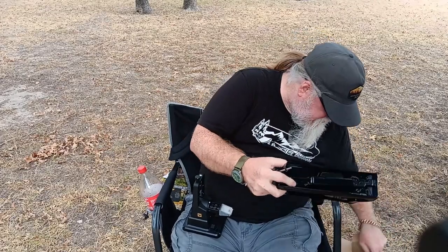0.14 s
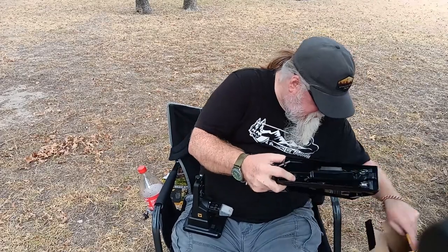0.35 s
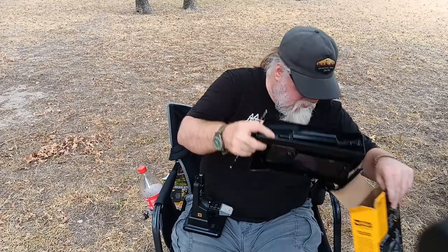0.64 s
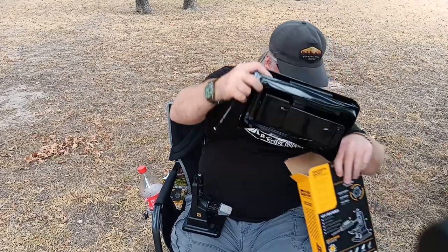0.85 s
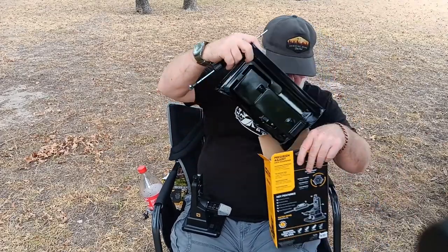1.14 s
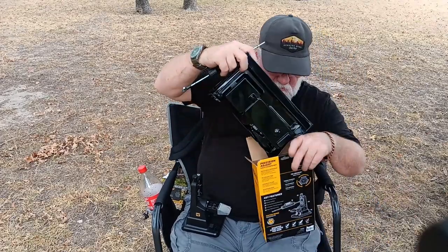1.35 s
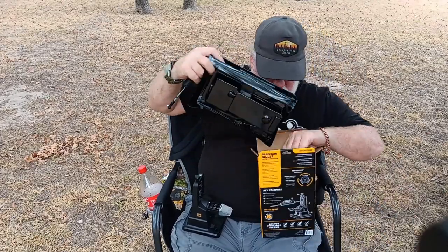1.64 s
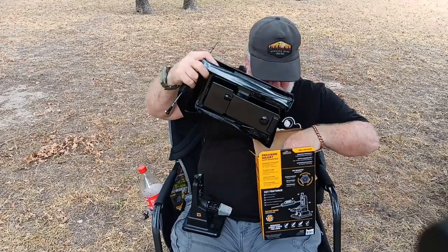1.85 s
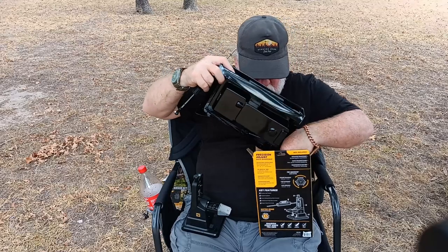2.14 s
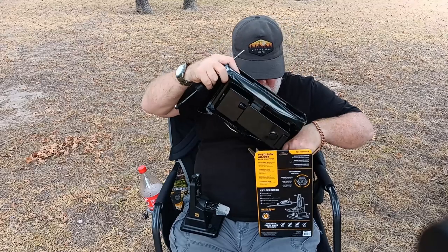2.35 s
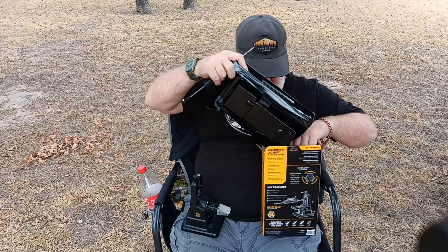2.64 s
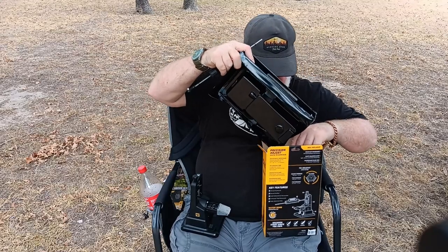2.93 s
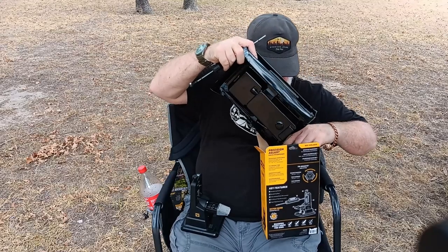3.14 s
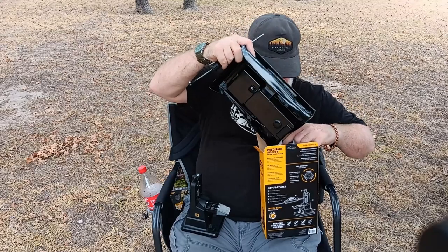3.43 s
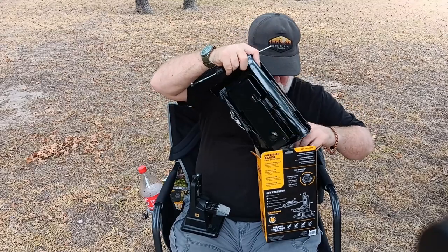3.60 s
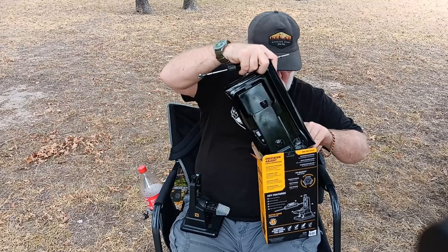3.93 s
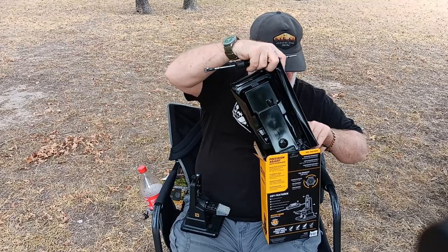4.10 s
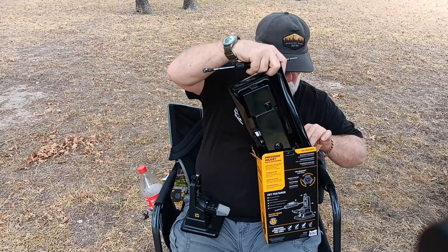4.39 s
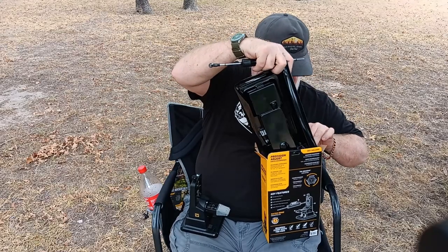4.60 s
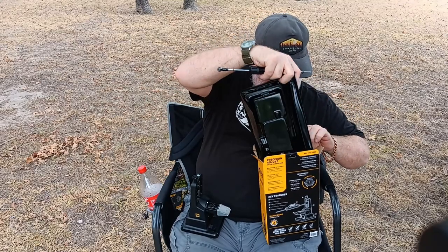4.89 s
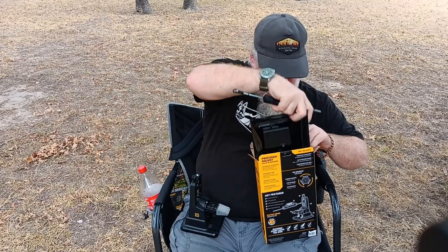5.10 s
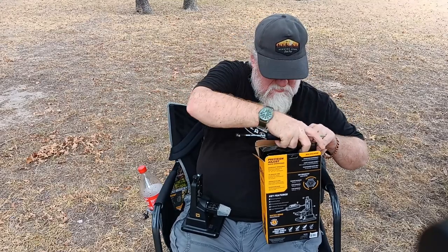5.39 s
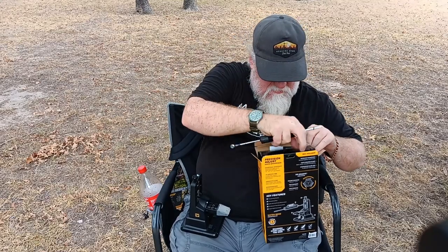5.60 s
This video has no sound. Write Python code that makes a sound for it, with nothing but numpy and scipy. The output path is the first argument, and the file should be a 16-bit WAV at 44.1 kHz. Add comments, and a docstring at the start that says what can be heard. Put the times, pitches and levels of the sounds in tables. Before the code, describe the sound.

Outdoors, a thin plastic tray clacks and clatters against a cardboard box, then scrapes down inside amid dull knocks as low wind rumble fades.

```python
"""Outdoors, wind rumbles and buffets the microphone from the start, then dies down, over a faint hiss of still air.
Light taps on gripped plastic, cardboard knocks and hand rubs come first; then a thin plastic tray clacks and clatters.
Near the end its rim sings faintly on the box edge, and the tray scrapes down into the box among the last knocks.
Blows ring each object's own tones over a noisy crack; rubs send tiny slips through the box's tones.
The wind is low filtered noise."""
import sys
import numpy as np
from scipy import signal
from scipy.fft import rfft, irfft
from scipy.io import wavfile

SR = 44100
rng = np.random.default_rng(int(sys.argv[2]) if len(sys.argv) > 2 else 0)


def inscribe(sig):
    """Save sig as 16-bit PCM at rate SR to the path in sys.argv[1].

    A 1-D sig is mono; a 2-D sig holds one channel per row.
    Samples are clipped to [-1, 1] before scaling.
    """
    pcm = np.round(np.clip(np.atleast_2d(sig).T, -1, 1) * 32767)
    wavfile.write(sys.argv[1], SR, pcm.astype(np.int16))


N = 253559
TIME = np.arange(N) / SR

# pitch ranges from thud to tick: low_hz [Hz], high_hz [Hz]
TONE_BANDS = [(170, 420), (420, 1100), (1100, 2900), (2900, 6500), (6500, 15000)]
# tones of the box's air space and panels: pitch_hz [Hz], width_hz [Hz], relative level_db [dB]
BOX_TONES = [(314, 20, 1.5), (397, 52.5, 3.5), (492, 48, 6), (563, 90, 4), (623, 59, -16), (816, 54, 6),
             (955, 110, 4), (1032, 42, -21), (1224, 97, -2), (1382, 60, -3.5), (1592, 39, -7.5),
             (1840, 210, -1), (2150, 86, -6), (2393, 650, -1.5), (3330, 46, -16.5), (2917, 640, -6),
             (3920, 92, -47.5)]
ATTACK_S = .025  # the part of a blow whose loudness is set
PLASTIC_BASS_DB_PER_OCT = 9  # fall below the ring


def undb(db):
    """Turn decibels into a gain."""
    return 10 ** (np.asarray(db) / 20)


def unit(x):
    """Scale to an average (rms) strength of 1."""
    return x / np.sqrt(np.mean(x ** 2))


def band(x, lo_hz, hi_hz, order=3):
    """Keep only the pitches between two limits."""
    limits_hz = [lo_hz, min(hi_hz, .45 * SR)]
    return signal.sosfilt(signal.butter(order, limits_hz, "band", fs=SR, output="sos"), x)


def colour(x, points, size=2048):
    """Filter through (Hz, dB) points, reacting as early as possible (minimum phase)."""
    hz, db = np.transpose(points)
    grid = np.maximum(np.arange(size // 2 + 1) * SR / size, 1)
    cepstrum = irfft(np.log(undb(np.interp(np.log(grid), np.log(hz), db))))
    # folding the cepstrum forward puts the response after time zero
    cepstrum[1:size // 2] *= 2
    cepstrum[size // 2 + 1:] = 0
    response = irfft(np.exp(rfft(cepstrum)))
    return signal.fftconvolve(x, response)[:len(x)]


def walk(rate):
    """Wander at random with a spread near 1, taking rate steps per second."""
    steps = rng.standard_normal(int(N / SR * rate) + 4)
    return np.interp(TIME * rate, np.arange(len(steps)), steps) * np.sqrt(3 / 2)


def wind():
    """Eddies at the microphone: a deep rumble and lighter buffeting above it, swelling with each gust."""
    # the breeze dies down: time_s [s], strength_db [dB, before the rumble and buffet levels]
    breeze = [(0, -31.5), (.35, -39.5), (.65, -56), (1.2, -50.5), (2.3, -57), (3.3, -59.5), (3.8, -78),
              (4.5, -81), (5.75, -74)]
    # gusts on top of it: peak_s [s], half_length_s [s], strength_db [dB, before those levels]
    gusts = [(0.045, 0.054, -31), (0.324, 0.055, -41.5), (0.81, .03, -48), (1.02, 0.091, -47),
             (1.241, 0.061, -40.5), (1.568, 0.075, -43.5), (1.816, 0.11, -44.5), (2.534, 0.049, -44),
             (2.663, .1, -63), (2.832, 0.055, -46), (3.079, 0.097, -46), (3.248, 0.096, -45.5),
             (3.622, 0.083, -49.5), (4.034, 0.04, -50.5), (4.633, 0.045, -55.5), (5.22, 0.12, -57)]
    rumble_db, buffet_db = -2, -12  # relative to the strength
    strength = undb(np.interp(TIME, *np.transpose(breeze)))
    for peak_s, half_length_s, strength_db in gusts:
        gust = undb(strength_db) * np.exp(-((TIME - peak_s) / half_length_s) ** 2)
        strength = np.hypot(strength, gust)
    rumble = unit(band(rng.standard_normal(N), 22, 58))
    buffet_points = [(45, -20), (80, -4), (115, 0), (150, -15), (240, -28), (500, -48), (2000, -80)]
    buffet = unit(colour(rng.standard_normal(N), buffet_points, size=8192))
    return strength * (undb(rumble_db) * rumble + undb(buffet_db) * buffet)


def still_air():
    """Steady faint noise of still outdoor air."""
    # its tone: pitch_hz [Hz], relative level_db [dB per Hz]
    air_tone = [(60, -10.5), (110, -12), (220, -27.5), (400, -14), (800, -24.5), (1500, -20), (4300, -32.5),
                (15000, -48.5)]
    return undb(-78.0) * unit(colour(rng.standard_normal(N), air_tone))


def fade(t, t60):
    """Die away steadily, 60 dB down after t60 seconds."""
    return np.exp(-np.log(1000) * t / t60)


def ring(t, hz, t60):
    """Sound one tone of a struck object."""
    return np.sin(2 * np.pi * hz * t) * fade(t, t60)


def contact(t, clatter_s, rate, chatter):
    """A first touch, then a spatter of more; the longer the edges skid, the more of the energy it holds."""
    touches = (rng.random(len(t)) < rate / SR) * rng.standard_normal(len(t))
    spatter = touches * np.sqrt(t / clatter_s) * np.exp(-t / clatter_s)
    push = spatter / np.sqrt(np.sum(spatter ** 2) + 1e-12) * chatter * clatter_s
    push[0] += 1
    return push


def crackle(push, grain, t60, damping, tilt_db):
    """Countless close tones heard as noise: every touch tops up their energy, and the treble dies first."""
    out = 0
    for k, (low_hz, high_hz) in enumerate(TONE_BANDS):
        band_t60 = t60 * (TONE_BANDS[2][0] / low_hz) ** damping
        keep = fade(1 / SR, band_t60) ** 2  # share of energy left after one sample
        energy = signal.lfilter([1], [1, -keep], push ** 2 + 1e-18)
        out = out + undb(k * tilt_db) * unit(grain[k] * np.sqrt(energy))
    return unit(out)


def attack_levels(db, dullness, ring_hz, colour_db, bass_db):
    """Fall from the ring to the bass and, the softer the contact, to the treble; the material colours it."""
    octaves = np.log2(np.sqrt(np.prod(TONE_BANDS, axis=1)) / ring_hz)
    treble_fall_db = dullness * np.maximum(octaves, 0)
    return db + np.array(colour_db) - treble_fall_db + bass_db * np.minimum(octaves, 0)


def weigh(x, band_db, size=2048):
    """Give a blow's attack its level in each band."""
    centres = [np.sqrt(lo * hi) for lo, hi in TONE_BANDS]
    hz = np.arange(size // 2 + 1) * SR / size
    for _ in range(2):  # the second pass corrects the first
        power = 2 * np.abs(rfft(x[:int(ATTACK_S * SR)], size)) ** 2 / (size * ATTACK_S * SR)
        have_db = [10 * np.log10(power[(hz >= lo) & (hz < hi)].sum()) for lo, hi in TONE_BANDS]
        x = colour(x, list(zip(centres, np.subtract(band_db, have_db))), size=1024)
    return x


def blows(table, modes, colour_db, bass_db, crack, crack_t60, damping, own_ring, own_t60, rate, chatter, rise_s):
    """Each blow rings the object's tones in a new mix, over a noisy crack."""
    out = np.zeros(N + SR)
    t = np.arange(SR // 5) / SR
    rings = np.array([undb(db) * ring(t, hz, t60) for hz, db, t60 in modes])
    grain = np.array([band(rng.standard_normal(N + SR), lo, hi) for lo, hi in TONE_BANDS])
    # small panels radiate little bass
    radiation = signal.butter(3, [185, 13500], "band", fs=SR, output="sos")
    for start_s, level_db, dullness, clatter_s, ring_hz in table:
        start = int(start_s * SR)
        span = slice(start, start + len(t))
        push = contact(t, clatter_s, rate, chatter)
        mix = rng.standard_normal(len(modes)) @ rings
        shell = unit(signal.fftconvolve(push, mix)[:len(t)])
        noise = crackle(push, grain[:, span], crack_t60, damping, tilt_db=-2)
        hit = unit(shell + crack * noise)
        # the panel that takes the blow rings loudest, and for longer under a dragging contact
        hit = hit + own_ring * unit(ring(t, ring_hz, own_t60 + 2 * clatter_s))
        # bending waves take a moment to spread
        hit = signal.sosfilt(radiation, hit * (1 - np.exp(-t / rise_s)))
        out[span] += weigh(hit, attack_levels(level_db, dullness, ring_hz, colour_db, bass_db))
    return out[:N]


def taps():
    """Fingers grip the plastic and deaden it, so light taps make short clean clicks."""
    # light taps: start_s [s], level_db [dB at the ring, before colour],
    # dullness [dB per octave above the ring], clatter_s [s], ring_hz [Hz]
    tap_hits = [(.148, -54.5, 8, .002, 2710), (.224, -65, 2, 0.0066, 910), (.242, -41.5, 8, 0.0032, 818),
                (3.142, -71, 10, .003, 2950), (4.558, -56.5, 9, 0.0096, 1360)]
    # tones of gripped plastic: pitch_hz [Hz], relative level_db [dB], t60_s [s]
    tap_tones = [(785, 0, 0.056), (1110, -1, 0.046), (1245, -7, 0.043), (1533, -3.5, 0.033),
                 (1726, -17.5, 0.032), (2160, -14.5, 0.04), (2486, -6.5, 0.044), (2810, -5, .04),
                 (3240, 2.5, 0.031), (4500, -19, 0.035), (4900, -11.5, 0.066)]
    # colour of the material: level_db [dB], one for each tone band
    tap_colour = [1, -3, 3.5, -0.5, -24.5]
    return blows(tap_hits, tap_tones, tap_colour, PLASTIC_BASS_DB_PER_OCT, crack=0.48, crack_t60=0.022,
                 damping=.5, own_ring=0.55, own_t60=0.014, rate=1200, chatter=330, rise_s=0.00058)


def box():
    """Cardboard: dull, quickly damped knocks; the wider a tone, the sooner it dies."""
    # knocks: start_s [s], level_db [dB at the ring, before colour],
    # dullness [dB per octave above the ring], clatter_s [s], ring_hz [Hz]
    box_hits = [(.158, -54.5, 6.5, 0.0069, 300), (.207, -48.5, 10.5, 0.023, 436),
                (.349, -60, 7, 0.0022, 324), (.441, -59, 9.5, 0.0026, 774), (.453, -47, 12, 0.003, 335),
                (.475, -50, 7.5, 0.0048, 348), (.598, -41, 6.5, 0.014, 498), (.64, -45.5, 17, 0.013, 500),
                (.674, -62.5, 5, .002, 497), (.978, -45.5, 8, 0.017, 560), (1.289, -40, 12.5, 0.017, 639),
                (1.31, -44, 14.5, 0.0034, 670), (1.336, -48.5, 6, .004, 460),
                (1.385, -43.5, 14, 0.016, 698), (1.392, -45.5, 8, 0.014, 746),
                (1.414, -49, 19.5, .006, 720), (1.462, -41, 6, .008, 597), (1.5, -45, 12, .018, 326),
                (1.62, -43, 8, .003, 330), (1.703, -62, 11.5, .006, 820), (1.923, -59.5, 10, 0.0068, 507),
                (1.983, -44, 13, 0.0018, 336), (2.077, -46.5, 5.5, 0.0079, 529),
                (2.103, -51, 21.5, 0.0028, 580), (2.136, -51, 34, 0.0047, 650),
                (2.209, -57.5, 12, 0.0047, 817), (2.31, -43.5, 11.5, 0.019, 488),
                (2.343, -45, 9.5, 0.0036, 536), (2.525, -61, 12, 0.0023, 800), (2.75, -59, 3, 0.013, 472),
                (3.238, -67, 17, 0.019, 513), (4.48, -65, 4, 0.011, 486), (4.622, -57.5, 12.5, 0.017, 448),
                (4.668, -60, 10, 0.022, 313), (4.782, -45, 6, .003, 790), (4.853, -37.5, 5.5, 0.013, 379),
                (4.922, -38, 8, 0.011, 378), (4.94, -46, 2.5, 0.0096, 337), (5.098, -49.5, 6.5, .01, 710),
                (5.232, -47.5, 3, .005, 283), (5.519, -53.5, 10, .005, 582), (5.542, -39, 7, 0.0014, 282),
                (5.628, -45.5, 6, 0.0069, 309), (5.656, -44, 5.5, 0.0031, 279),
                (5.69, -39, 10.5, 0.0032, 307)]
    # colour of the material: level_db [dB], one for each tone band
    box_colour = [1.5, 2.5, 2.5, -0.5, -4]
    modes = [(hz, db, np.log(1000) / (np.pi * width)) for hz, width, db in BOX_TONES]
    return blows(box_hits, modes, box_colour, bass_db=10.5, crack=0.38, crack_t60=0.039, damping=0.99,
                 own_ring=1.01, own_t60=0.072, rate=1800, chatter=156, rise_s=0.00093)


def stroke(start, length):
    """A touch that presses in, holds and lifts off."""
    attack_s, release_s = 0.018, 0.026
    t = TIME - start
    return np.clip(np.minimum(t / attack_s, (length - t) / release_s), 0, 1)


def stroke_gains():
    """Body, rasp and hiss of single strokes of hand and tray, which ease off as they go."""
    # strokes on cardboard: start_s [s], length_s [s], rasp_db [dB, before rubbing's trim],
    # body_db [dB relative to the rasp], hiss_db [dB relative to the rasp]
    strokes = [(.3, 0.086, -75.5, 1, 4.5), (.67, 0.074, -72.5, 0, -8), (.86, 0.12, -64, 16, -13),
               (.98, 0.22, -74.5, 19.5, -3.5), (1.28, 0.24, -58.5, 11, -12), (1.423, 0.072, -48, 0, -9),
               (1.48, 0.097, -60.5, 10, -8.5), (1.62, 0.37, -72, 11.5, 1), (1.788, 0.051, -63.5, 2, -5),
               (1.978, 0.11, -59.5, 3.5, -2), (2.07, 0.18, -66.5, 1, -9.5), (2.229, 0.21, -62, 10.5, -6.5),
               (2.39, 0.096, -61, -10, -7), (2.479, 0.068, -68, 11, -1.5), (2.647, 0.099, -56.5, -7.5, -23),
               (2.72, 0.11, -64, 4.5, -14.5), (2.84, .24, -83.5, 8.5, -20), (3.22, 0.11, -80.5, 7, -26),
               (3.449, 0.14, -61.5, 12, -10), (3.623, 0.076, -59, 9, -17), (3.675, .085, -52.5, 0.5, -8.5),
               (3.73, 0.092, -62, -1, -25), (3.828, 0.19, -62, 3.5, -13), (4.06, .06, -65, 9.5, -12),
               (4.201, 0.12, -66, 7.5, -20), (4.431, 0.085, -73.5, 15.5, -25),
               (5.528, 0.23, -58.5, 15, -10), (5.67, 0.093, -71, 20, -9)]
    sag_db_per_s = 15.5
    out = np.zeros((3, N))
    for start_s, length_s, rasp_db, body_db, hiss_db in strokes:
        sag = undb(-sag_db_per_s * np.clip(TIME - start_s, 0, length_s))
        levels = undb([rasp_db + body_db, rasp_db, rasp_db + hiss_db])
        out = np.hypot(out, np.outer(levels, stroke(start_s, length_s) * sag))
    return out


def holding_gains():
    """Body, rasp and hiss of fingers that keep shifting while they hold the box."""
    start_s, end_s = .4, 4.7
    fidget = stroke(start_s, end_s - start_s) * undb(2 * walk(rate=15))
    return np.outer(undb([-74, -84.5, -100]), fidget)  # dB, before rubbing's trim


def slide_gains():
    """Body, rasp and hiss as the tray slides down into the box: pressing harder brightens the sound."""
    # the slide: time_s [s], pressure_db [dB, before the jerks]
    slide_path = [(4.689, -78), (4.76, -54), (4.85, -40.5), (4.93, -40), (5.0, -52), (5.13, -55.5),
                  (5.17, -47.5), (5.21, -52), (5.269, -59.5), (5.34, -100)]
    firm_pressure_db = -41
    # each layer: dB at firm pressure (before rubbing's trim), dB per dB of pressure
    body, rasp, hiss = (-38.5, 0.69), (-40, 1.02), (-53, 0.93)
    time_s, pressure_db = np.transpose(slide_path)
    # the pressure jerks as the rim catches
    jerks_db = 1 * walk(rate=60)
    pressure = np.interp(TIME, time_s, pressure_db) - firm_pressure_db + jerks_db
    slide = np.array([undb(firm_db + growth * pressure) for firm_db, growth in (body, rasp, hiss)])
    return slide * stroke(time_s[0], time_s[-1] - time_s[0])


def slips(rate, spread_db):
    """Dense stick-slip clicks of fine contact points, mostly small and now and then large."""
    size = undb(spread_db * np.minimum(rng.exponential(size=N), 5))
    return unit((rng.random(N) < rate / SR) * rng.choice([-1, 1], N) * size)


def rubbing():
    """Slips drive the box's tones; the finest of them hiss straight from the surface."""
    body, rasp, hiss = np.hypot(np.hypot(stroke_gains(), holding_gains()), slide_gains())
    # the contact catches and lets go many times a second
    grip = undb(2.2 * walk(rate=70))
    drive = grip * (slips(rate=2400, spread_db=3.6) + .5 * rng.standard_normal(N))
    hollow = 0
    for pitch_hz, width_hz, level_db in BOX_TONES:
        # as the point of contact moves, each tone comes and goes
        reach = undb(3.3 * walk(rate=22))
        mode = signal.lfilter(*signal.iirpeak(pitch_hz, pitch_hz / width_hz, fs=SR), drive * reach)
        hollow = hollow + rng.choice([-1, 1]) * undb(level_db) * unit(mode)
    hollow = unit(hollow) + .38 * drive
    low = unit(band(hollow, 240, 1050, order=4))
    middle = unit(band(hollow, 1300, 3500))
    surface_points = [(2500, -40.5), (4000, -1.5), (5500, 5.0), (6800, -6.0), (11500, -9.0), (15500, -20.5)]
    surface = unit(colour(drive, surface_points))
    # the trim of the three layers, in dB
    return undb(-1.5) * body * low + undb(-0.25) * rasp * middle + undb(-2.9) * hiss * surface


def tray():
    """Thin stiff plastic: bright clacks with a short hollow ring."""
    # clacks: start_s [s], level_db [dB at the ring, before colour],
    # dullness [dB per octave above the ring], clatter_s [s], ring_hz [Hz]
    tray_hits = [(.849, -43.5, 3, 0.013, 776), (.858, -36, 4.5, 0.0074, 570), (.888, -38, 9, 0.016, 766),
                 (.927, -37, 6, 0.003, 787), (.938, -44, 14, 0.015, 792), (1.066, -37.5, 6.5, 0.00039, 520),
                 (1.077, -39, 12.5, 0.0024, 765), (1.794, -41, 7, 0.0028, 564),
                 (2.272, -41, 4.5, 0.0019, 500), (2.392, -33.5, 7.5, 0.00053, 745),
                 (2.842, -74, 2.5, 0.0041, 483), (2.905, -78.5, -1, 0.0056, 745),
                 (3.054, -60, 4, 0.0075, 513), (3.424, -35, 0.27, 0.0032, 479),
                 (3.54, -51.5, 12.5, 0.015, 875), (3.911, -36.5, 4, 0.0034, 560),
                 (4.104, -29, 4, 0.0059, 315), (4.117, -30, 4, 0.0069, 672), (4.14, -34, 7.5, 0.004, 786),
                 (4.16, -38.5, 9.5, .009, 1424), (4.177, -43, 12, 0.014, 770), (4.351, -60, 10, 0.039, 970),
                 (4.804, -45, 1, 0.0015, 794), (4.836, -45.5, -3.5, 0.0028, 1880),
                 (5.168, -42, 9, 0.014, 865)]
    # tones of the tray's shell: pitch_hz [Hz], relative level_db [dB], t60_s [s]
    tray_tones = [(197, -8, .13), (307, -7, .17), (468, -6, .16), (630, -6, .13), (684, -3, .13),
                  (797, 0, .12), (885, -4, .11), (1023, -4, .08), (1222, -3, .08), (1340, -4, .075),
                  (1520, -5, .08), (1735, -1, .07), (1915, 0, .06), (2274, 1, .05), (2606, -3, .04),
                  (2950, -5, .04), (3500, -7, .03), (4300, -9, .025), (5090, -11, .02)]
    # colour of the material: level_db [dB], one for each tone band
    tray_colour = [-3, 0.5, 2.5, -5.5, -17.5]
    return blows(tray_hits, tray_tones, tray_colour, PLASTIC_BASS_DB_PER_OCT, crack=1.68, crack_t60=0.039,
                 damping=0.85, own_ring=0.47, own_t60=0.067, rate=2400, chatter=240, rise_s=0.00028)


def rim():
    """The tray's rim drags on the box edge: fine slips keep a few of its tones singing faintly."""
    # tones of the rim: pitch_hz [Hz], width_hz [Hz], relative level_db [dB]
    rim_tones = [(964, 52, 0), (1300, 180, -3), (1860, 55, -3), (2260, 73, -8), (2960, 200, -1),
                 (5360, 60, -20)]
    drive = slips(rate=3000, spread_db=2)
    song = 0
    for pitch_hz, width_hz, level_db in rim_tones:
        tone = unit(signal.lfilter(*signal.iirpeak(pitch_hz, pitch_hz / width_hz, fs=SR), drive))
        song = song + undb(level_db + 3 * walk(rate=18)) * tone
    return undb(-66) * stroke(start=4.2, length=.27) * unit(band(song, 700, 5800))


def yard(x, t60, wet_db):
    """Faint scatter from the ground and nearby trees, as a short tail of fading noise."""
    t = np.arange(SR) / SR
    tail_points = [(150, -26.0), (400, 4.5), (2800, 10.5), (6000, 6.0), (12000, -26.5)]
    tail = colour(rng.standard_normal(SR), tail_points)
    tail *= fade(t, t60) * (1 - np.exp(-t / 0.022))
    return x + undb(wet_db) * signal.fftconvolve(x, tail / np.sqrt(np.sum(tail ** 2)))[:N]


def scene():
    """Handling sounds in the open air, with wind."""
    handling = taps() + box() + rubbing() + tray() + rim()
    return (yard(handling, t60=0.16, wet_db=-37) + wind() + still_air())[None]


def record(dry):
    """The recorder cuts the top, above 15800 Hz."""
    return signal.sosfilt(signal.ellip(8, .2, 70, 15800, fs=SR, output="sos"), dry)


dry = scene()
out = record(dry)
inscribe(out)
```